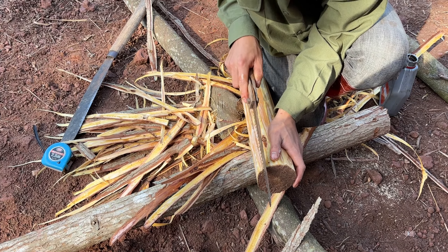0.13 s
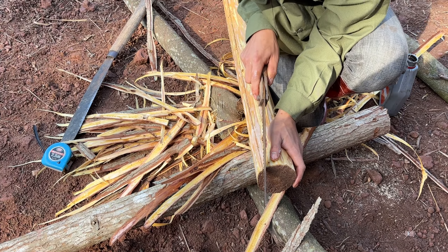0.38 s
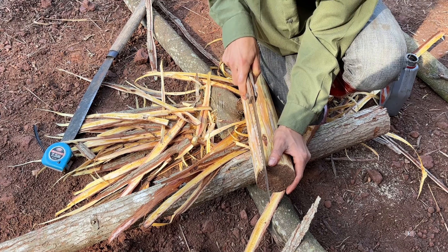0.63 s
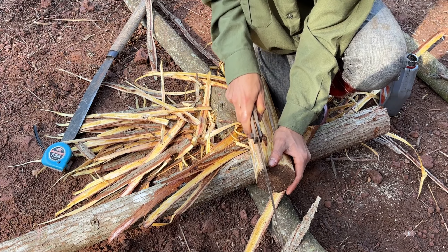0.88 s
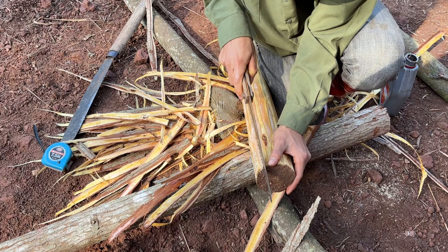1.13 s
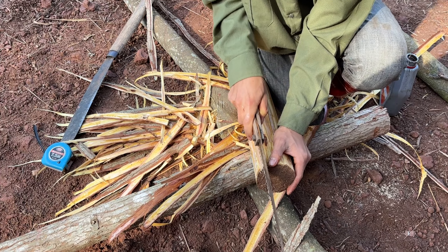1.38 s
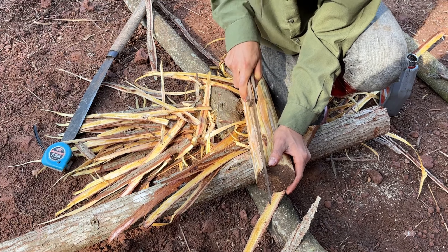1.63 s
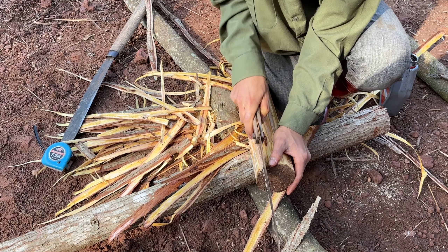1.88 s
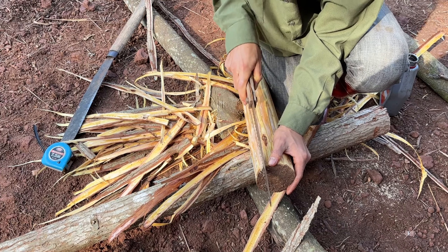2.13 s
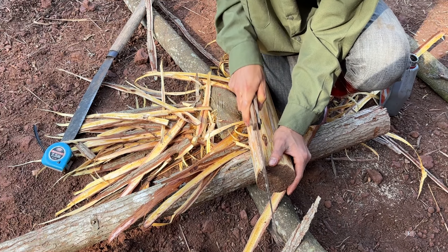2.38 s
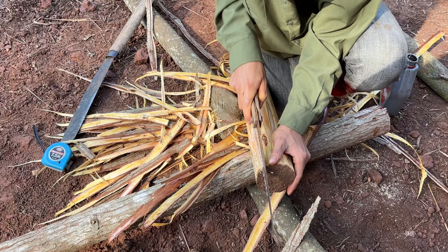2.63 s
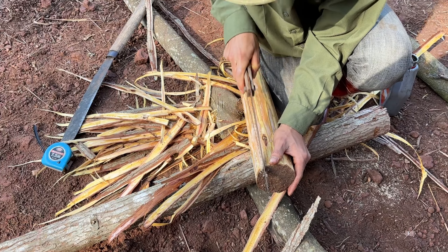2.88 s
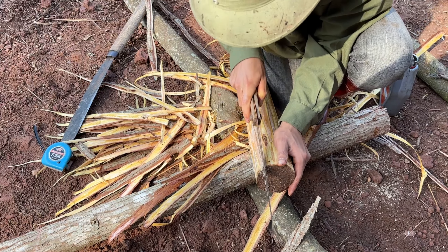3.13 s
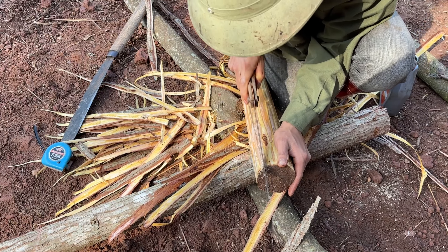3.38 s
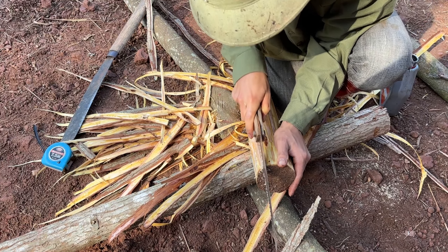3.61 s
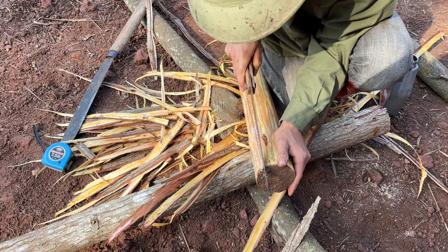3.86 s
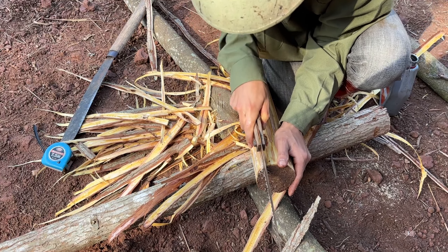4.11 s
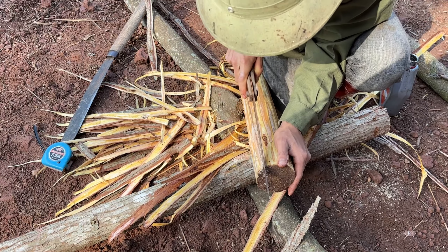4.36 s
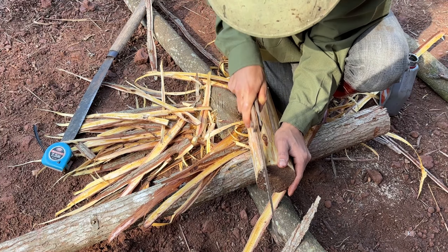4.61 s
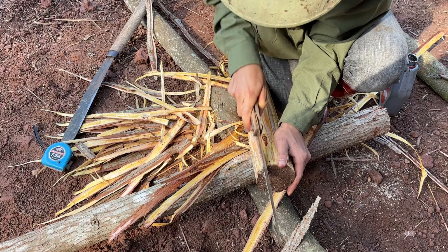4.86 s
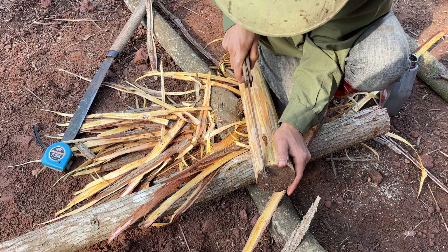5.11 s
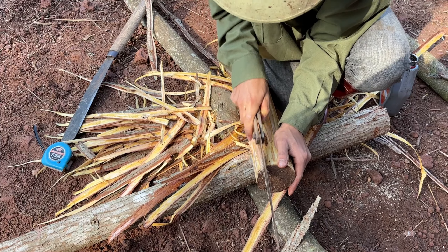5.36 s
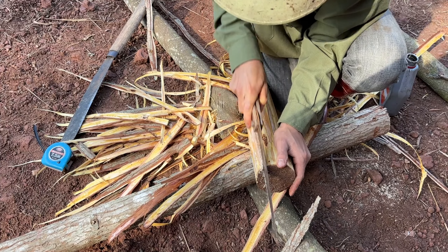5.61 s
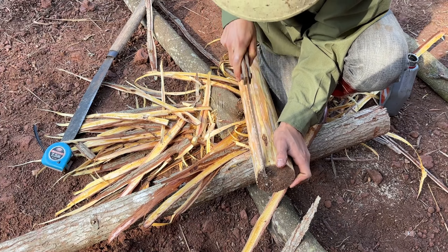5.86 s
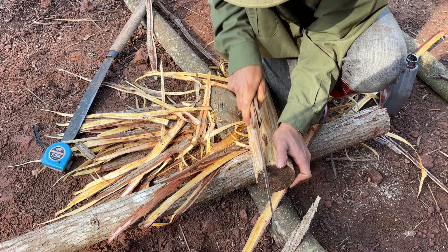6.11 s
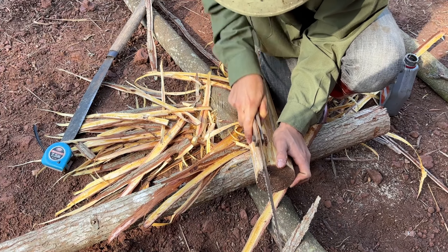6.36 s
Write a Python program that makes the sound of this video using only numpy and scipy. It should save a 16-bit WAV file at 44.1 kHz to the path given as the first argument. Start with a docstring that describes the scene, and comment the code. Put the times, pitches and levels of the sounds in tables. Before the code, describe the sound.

After faint rustling and light taps, a handsaw rasps through wood close by, woody and grainy, its strokes becoming faster, louder and harsher.

```python
"""Outdoors, a grainy noise floor with rustling cloth and leaves; over it a faint sine whistle falls in pitch.
A few ticks sound during and after the whistle: short noise bursts that excite resonances of blade and pole.
Then a coarse hand saw cuts a peeled pole near two microphone ports: tooth strikes, their rate rising and falling
with each stroke, drive the wood and its rings, while random clicks of torn fibre and grit rasp.
Later, dry snaps of fibre mark some turns of the blade, and at one turn a gliding tone squeaks."""
import sys
import numpy as np
from scipy import signal
from scipy.fft import rfft, irfft, next_fast_len
from scipy.io import wavfile
from scipy.ndimage import uniform_filter1d

SR = 44100
rng = np.random.default_rng(int(sys.argv[2]) if len(sys.argv) > 2 else 0)


def undo_db(level):
    """Turn decibels back into plain size, where 20 dB means ten times bigger."""
    steps = np.asarray(level, float) / 20
    return 10 ** steps


def unload_wav(signal):
    """Save mono or channel-first audio to the path in sys.argv[1] as 16-bit WAV at rate SR, clipped to [-1, 1]."""
    wavfile.write(
        sys.argv[1],
        SR,
        np.round(np.clip(np.atleast_2d(signal).T, -1, 1) * 32767).astype(np.int16),
    )


N = 286209

# floor before the cut, with rustles and a brief swell at a tick: (time [s], level [dB], treble level [dB])
FLOOR_COURSE = [(0.0, -71, -66), (0.034, -73, -76), (0.076, -63.5, -82), (0.086, -68, -70),
                (0.094, -68, -78), (0.274, -72.5, -82), (0.278, -73, -67), (0.368, -72, -62),
                (0.398, -70.5, -80), (0.5, -73, -78), (0.51, -55, -79), (0.522, -67, -78), (0.66, -82, -87)]
# spectrum of the open-air floor: (frequency [Hz], gain [dB])
AIR_SPECTRUM = [(30, -2), (64, 0), (234, -13), (311, -9), (734, -15), (1180, -18.5), (3460, -15.5),
                (5000, -28), (8000, -39)]
# spectrum of its leafy treble: (frequency [Hz], gain [dB])
LEAF_SPECTRUM = [(2500, -28), (4500, -14), (8000, -8), (13000, -7), (15500, -18)]
# falling whistle: (time [s], frequency [Hz], level [dB])
WHISTLE_PATH = [(0, 1850, -75), (.1, 1760, -75), (.18, 1670, -78), (.22, 1600, -88), (.25, 1570, -110)]
# light taps on the pole: (time [s], level [dB])
TICK_EVENTS = [(0.046, -57), (0.068, -56), (0.132, -59), (0.192, -50), (0.291, -50), (0.362, -32),
               (0.412, -53), (0.507, -32), (0.551, -33.5), (0.575, -50)]
# resonances of blade and pole: (frequency [Hz], width under the saw [Hz], level [dB])
RING_MODES = [(1518.4, 26, -8), (1773, 19, -16), (2634, 17, -22.5), (3099, 238, -14.5), (3278, 236, -14),
              (3484, 210, -21.5)]
# the three resonances that sing out: (frequency [Hz], width under the saw [Hz])
CLEAR_MODES = [(360, 23), (634, 8.9), (925, 8.3)]
# strokes, push and pull in turn: (start time [s], time of greatest speed [s], top rate of tooth pairs [Hz],
# bite level [dB], rasp level [dB], tooth knock level [dB], lean [exponent: under 1 late, over 1 early])
STROKE_TABLE = [(0.62, 0.792, 100.8, -32.5, -46.5, -4.5, 1.02),
                (0.849, 1.035, 96.46, -32.5, -42.5, -5, 0.99), (1.099, 1.282, 111.2, -30.5, -44, -8, 0.87),
                (1.342, 1.432, 109.2, -31.5, -41, -4, 0.91), (1.588, 1.785, 103.9, -45.5, -51, -3, 1.2),
                (1.851, 1.971, 106.2, -29, -42.5, 0.5, 1), (2.069, 2.225, 115.5, -30, -45.5, -7, 0.89),
                (2.312, 2.432, 109.3, -34.5, -43, -4.5, 1.04),
                (2.529, 2.662, 117.4, -31.5, -44.0, -6.5, 0.99),
                (2.73, 2.849, 122.7, -36.5, -41.5, -1.5, 1.105),
                (2.96, 3.165, 82.5, -35, -48.5, -2.5, 0.85), (3.248, 3.318, 105.1, -37, -43.5, -6.5, 1.09),
                (3.468, 3.6, 110.1, -30, -44.5, -6.5, 1.175), (3.679, 3.836, 130.5, -31, -40.5, -17, 1.04),
                (3.891, 4.049, 124.5, -29, -42.0, -7.5, 0.96),
                (4.117, 4.248, 113.9, -32.5, -39.5, -1.5, 1.03), (4.34, 4.502, 126.4, -28, -41, -3.5, 1.07),
                (4.561, 4.686, 151.6, -34.0, -35.5, 0.5, 0.98), (4.751, 4.896, 147.8, -30, -38.0, -3, 0.97),
                (4.953, 5.046, 119.9, -42.5, -35, -5, 0.9), (5.142, 5.266, 180.9, -27.5, -36.5, -4.5, 0.99),
                (5.34, 5.454, 164.3, -28.5, -34, -8, 1.02), (5.517, 5.657, 178.6, -25, -37.5, -8.5, 1.04),
                (5.71, 5.762, 141.6, -40, -34.5, -9, 1.01), (5.89, 5.993, 189.5, -26.0, -37.0, -6.5, 1.09),
                (6.071, 6.182, 209.2, -30, -32.5, -13, 0.85), (6.238, 6.368, 179.8, -23.5, -36, -2.5, 0.98),
                (6.421, 6.473, 141.7, -27.5, -36.5, -5.5, 1.15)]
# course of a push stroke: (share of the stroke [0 to 1], bite [dB], rasp [dB], low shake [dB], clear rings [dB])
PUSH_COURSE = [(0, -13, -41, 2, -15), (.1, -17.5, -11.5, -7, -20), (.25, -3.5, -6.5, -14.5, -3),
               (.45, -1.5, -2, -14.5, 3.5), (.63, -4, 2, -11, -0.5), (.8, -5, -3.5, -13, 2.5),
               (.9, -12, -12.5, 4, -8.5), (.999, -16, -75, -2, -6)]
# course of a pull stroke: (share of the stroke [0 to 1], bite [dB], rasp [dB], low shake [dB], clear rings [dB])
PULL_COURSE = [(0, -25, -32.5, -2, -26), (.1, -19.5, -16.5, -1, -26), (.25, -7.5, -4.5, -10.5, 0),
               (.45, -4, 0.5, 1.5, -1), (.63, -7, -1.5, -9.5, 4.5), (.8, -7.5, -7, -2, 0),
               (0.899, -22, -17.5, -7, -3), (.999, -22, -47, 3, -18)]
# the teeth catch and bite deeper: (time [s], level [dB])
CATCH_EVENTS = [(0.77, -27), (0.988, -27.5), (1.229, -23), (1.511, -32), (1.749, -22.5), (1.976, -26),
                (2.213, -25.5), (2.398, -21), (2.636, -29.5), (2.846, -38), (3.802, -39), (4.01, -13),
                (4.068, -28), (4.214, -26.5), (4.405, -34), (4.446, -18.5), (4.84, -27), (5.024, -27.5),
                (5.225, -31), (5.272, -27), (5.46, -18), (5.614, -29.0), (5.764, -26.5), (5.951, -24),
                (5.986, -27), (6.163, -38), (6.205, -32), (6.336, -18.5), (6.375, -21), (6.473, -32)]
# the pole thumps on its support: (time [s], level [dB])
THUMP_EVENTS = [(0.795, -29.5), (0.944, -34), (1.295, -38), (1.505, -33.0), (1.807, -29), (1.935, -32),
                (2.274, -37), (2.421, -39), (2.472, -33), (2.7, -37.0), (3.641, -33), (3.759, -50),
                (4.015, -48), (4.093, -28.5), (4.253, -29), (4.536, -43), (4.94, -29.5), (5.045, -36),
                (5.337, -33), (5.516, -38.0), (5.701, -44), (5.79, -41), (6.064, -37.0), (6.419, -34)]
# a clear ring sings out: (time [s], ring frequency [Hz], level [dB])
SING_EVENTS = [(0.772, 634, -44), (0.783, 360, -43), (0.985, 360, -39), (0.996, 925, -36.5),
               (1.025, 634, -37), (1.233, 634, -34), (1.242, 925, -40), (1.305, 925, -42.0),
               (1.451, 925, -38.0), (1.474, 634, -40), (1.739, 360, -35.0), (1.749, 634, -32.5),
               (1.773, 925, -32.5), (1.974, 360, -47), (1.983, 634, -32), (1.995, 925, -44),
               (2.244, 360, -41), (2.245, 925, -40), (2.39, 360, -38.5), (2.408, 634, -29.0),
               (2.442, 360, -32.5), (2.466, 925, -44), (2.63, 925, -40.5), (2.662, 360, -31),
               (2.688, 925, -43), (2.837, 634, -29.5), (2.848, 360, -35.5), (2.852, 925, -43.5),
               (3.111, 634, -36), (3.357, 634, -41), (3.421, 634, -35.5), (3.569, 634, -33),
               (3.586, 360, -34), (3.619, 634, -42), (3.852, 634, -32.5), (4.013, 634, -22.5),
               (4.014, 360, -28.5), (4.015, 925, -36.0), (4.056, 925, -42), (4.07, 360, -30.5),
               (4.221, 634, -34), (4.239, 360, -40), (4.408, 360, -46), (4.424, 634, -40),
               (4.448, 925, -31.5), (4.471, 634, -33), (4.516, 360, -39.5), (4.673, 634, -33),
               (4.679, 925, -39), (4.802, 360, -36), (4.818, 925, -42), (4.822, 634, -36),
               (4.863, 634, -27.5), (4.896, 925, -33), (5.029, 925, -31.5), (5.054, 634, -39),
               (5.109, 634, -34), (5.22, 360, -37), (5.273, 925, -31), (5.275, 360, -44), (5.299, 634, -45),
               (5.392, 925, -43.5), (5.45, 925, -36), (5.474, 634, -28.5), (5.489, 360, -40),
               (5.608, 634, -28.0), (5.618, 360, -40), (5.652, 925, -26), (5.672, 634, -42),
               (5.76, 925, -36.5), (5.762, 360, -33), (5.805, 634, -24.5), (5.807, 360, -36),
               (5.809, 925, -35), (5.866, 925, -41.0), (5.988, 360, -36), (5.99, 634, -46),
               (5.989, 925, -28), (6.158, 925, -42), (6.16, 634, -34.5), (6.218, 634, -30),
               (6.314, 925, -27.5), (6.318, 634, -25.5), (6.337, 360, -29.5)]
# the blade rasps harder for a moment, or rubs on through a turn: (time [s], level [dB])
RUB_EVENTS = [(0.695, -53), (1.16, -58), (1.26, -48), (1.759, -42), (1.967, -41.0), (2.234, -62),
              (2.406, -37), (3.009, -48.0), (3.251, -49), (3.339, -53), (3.753, -60), (3.938, -53.5),
              (4.055, -46.5), (4.221, -38), (4.34, -48), (5.041, -52), (5.781, -39), (6.353, -44)]
# levels over the rasp: (time [s], scrape level [dB], high ring level [dB])
SCRAPE_COURSE = [(.6, -1, 1.5), (1.4, 4, 1.5), (1.8, 3.5, 1.5), (2.8, 3, 2.5), (4.0, -0.5, 0.5),
                 (4.6, 2, 2), (5.2, 2.5, 2), (6.0, 5, 6), (6.5, 1.5, 2)]
# spectrum of the struck wood: (frequency [Hz], gain [dB])
WOOD_SPECTRUM = [(60, -43.5), (100, -9.5), (200, -2), (300, -2), (420, -5), (560, -3.5), (780, -10.5),
                 (1100, -32.5), (1500, -48), (2500, -71.5)]
# spectrum of the rasping grit: (frequency [Hz], gain [dB])
RASP_SPECTRUM = [(700, 5.5), (1300, 7.5), (2200, -18), (4000, -2.5), (5500, -7.5), (8000, -2), (10000, -1),
                 (13000, -10), (14600, -9.5), (15700, -24)]
# spectrum of the scrape: (frequency [Hz], gain [dB])
SCRAPE_SPECTRUM = [(600, -40), (1000, -34), (1500, 7.5), (2200, -3.5), (3000, -11.5), (4500, -7.5)]
# spectrum of the shaken pole: (frequency [Hz], gain [dB])
SHAKE_SPECTRUM = [(25, -45), (45, -38.5), (60, 17.5), (80, -11), (108, 9), (135, 5), (200, -49.5)]
# fibre snaps at the turns of the blade: (time [s], level [dB])
SNAP_EVENTS = [(1.3858, -58), (2.359, -23), (2.4937, -44), (2.518, -33), (2.5431, -32), (3.003, -30),
               (4.0794, -28), (4.1595, -34), (4.591, -41), (4.9843, -29), (5.899, -26)]
# squeak of the blade at one turn: (time [s], frequency [Hz], level [dB])
SQUEAK_PATH = [(2.488, 3440, -75), (2.494, 3650, -47), (2.499, 4050, -55), (2.504, 4580, -80)]
# phase between left and right, with fixed steps in the treble: (frequency [Hz], phase [turns])
LEFT_RIGHT_PHASE = [(0, 0), (2200, 0), (3000, .06), (3800, 0), (4900, 0), (5600, -.15), (6400, 0),
                    (7400, 0), (9500, -.485), (10500, -.515), (12200, -1), (13200, -1), (14800, -1.46),
                    (15300, -1.49), (22050, -1.49)]
# gain on the left, its inverse on the right: (frequency [Hz], gain [dB])
LEFT_GAIN = [(60, -0.5), (1200, -0.8), (2500, -0.5), (3000, 0)]
# spectrum of a diffuse part added with opposite sign left and right: (frequency [Hz], gain [dB])
DIFFUSE_SPECTRUM = [(60, -10), (300, -14), (1200, -7.5), (2500, -5), (3400, -8), (4500, -36), (5600, 0.5),
                    (7000, -17), (8500, -59), (11500, -86), (12800, -36), (14200, -36)]

LAST_TURN_S = 6.6   # end of the last stroke, beyond the end of the sound
TOUCH_S = .664      # the moving blade meets the wood
SHAKE_DB = -43
CLEAR_UNDER_BITE_DB = (15, 14.5, 19)
# slopes of the swells: (up [dB/s], down [dB/s])
CATCH_SLOPES, THUMP_SLOPES = (460, 650), (270, 410)
SING_SLOPES, RUB_SLOPES = (470, 470), (440, 330)


def rms_one(x):
    """Normalisation to unit root-mean-square amplitude."""
    return x / np.sqrt(np.mean(x ** 2) + 1e-20)


def in_time(rows):
    """Linear interpolation of a table's columns, one value a sample."""
    s, *columns = np.transpose(rows)
    return [np.interp(np.arange(N) / SR, s, column) for column in columns]


def at_hz(points, hz):
    """Interpolation of a spectrum table on a logarithmic frequency axis."""
    table_hz, db = np.transpose(points)
    return np.interp(np.log(hz), np.log(table_hz), db)


def colour(x, points):
    """Minimum-phase filtering by the folded cepstrum: the response is causal, so nothing sounds early."""
    size = 8192
    hz = np.arange(1, size // 2 + 2) * SR / size
    cepstrum = irfft(np.log(undo_db(at_hz(points, hz))))
    cepstrum[1:size // 2] *= 2
    cepstrum[size // 2 + 1:] = 0
    response = irfft(np.exp(rfft(cepstrum)))[:size // 2]
    return signal.fftconvolve(x, response)[:N]


def resonance(x, hz, width_hz):
    """A damped mode as a two-pole resonance with unit gain at its peak."""
    r = np.exp(-np.pi * width_hz / SR)
    zeros = [(1 - r * r) / 2, 0, (r * r - 1) / 2]
    poles = [1, -2 * r * np.cos(2 * np.pi * hz / SR), r * r]
    return signal.lfilter(zeros, poles, x + 1e-18)


def grains(per_s, spread_db):
    """Shot noise: random clicks of either sign, with exponentially spread levels, rms 1."""
    sizes = undo_db(spread_db * np.minimum(rng.exponential(1, N), 4)) * rng.choice([-1, 1], N)
    return rms_one(sizes * (rng.random(N) < per_s / SR))


def drift(rate_hz):
    """Slow random fluctuation: white noise through a double real pole, rms 1."""
    r = np.exp(-2 * np.pi * rate_hz / SR)
    settle = 9000
    noise = rng.standard_normal(N + settle)
    return rms_one(signal.lfilter([1], [1, -2 * r, r * r], noise)[settle:])


def bursts(events, dull_hz, rise_s, decay_s):
    """Contact noise: short band-passed puffs, a softer contact having a lower upper limit."""
    out, t = np.zeros(N), np.arange(2500) / SR
    band = signal.butter(2, [200, dull_hz], "band", fs=SR, output="sos")
    rise = (1 - np.exp(-t / rise_s)) ** 2
    shape = rise * (np.exp(-t / decay_s) + 0.013 * np.exp(-t / (5 * decay_s)))
    for s, level_db in events:
        puff = rms_one(signal.sosfilt(band, rng.standard_normal(len(t))))
        start = round(s * SR)
        out[start:start + len(t)] += undo_db(level_db - 13.5) * puff * shape
    return out


def glide(rows):
    """A sinusoid whose phase integrates a table of frequency and level, silent outside it."""
    (first_s, first_hz, _), (last_s, last_hz, _) = rows[0], rows[-1]
    hz, level_db = in_time([(first_s - .002, first_hz, -140), *rows, (last_s + .002, last_hz, -140)])
    return np.sqrt(2) * undo_db(level_db) * np.sin(2 * np.pi * np.cumsum(hz) / SR)


def air():
    """Outdoor floor as coloured shot noise, its level set by a table; its treble fluctuates independently."""
    floor_db, treble_db = in_time(FLOOR_COURSE + [(.7, -81, -73)])
    floor = rms_one(colour(grains(4000, spread_db=-3.0), AIR_SPECTRUM))
    leaves = rms_one(colour(grains(6000, spread_db=3.0), LEAF_SPECTRUM))
    return undo_db(floor_db + 2.5 + 2.0 * drift(47.0)) * floor + undo_db(treble_db + 3.1 * drift(30)) * leaves


def whistle():
    """A faint pure tone falling in frequency."""
    return glide(WHISTLE_PATH)


def ticks():
    """Impulsive excitation: light taps on the pole also stir its modes, which here are broad and die fast."""
    taps = bursts(TICK_EVENTS, dull_hz=2580, rise_s=0.0014, decay_s=0.0031)
    rung = sum(undo_db(db) * resonance(taps, hz, 5.4 * width) for hz, width, db in RING_MODES)
    rung += sum(resonance(taps, hz, 16.0 * width) for hz, width in CLEAR_MODES)
    return taps + undo_db(13.0) * rung


def per_stroke(column):
    """A stepwise control: one value held through each stroke."""
    table = np.array(STROKE_TABLE)
    now = np.searchsorted(table[:, 0], np.arange(N) / SR) - 1
    return table[np.maximum(now, 0), column]


def teeth(arch=.6):
    """Strikes follow the distance travelled: the hand speeds up and slows, and set teeth alternate in strength."""
    jitter, weak_db, uneven_db = .04, -6, 1.5   # jitter in tooth spacings
    times = np.append(np.array(STROKE_TABLE)[:, :2].ravel(), LAST_TURN_S)
    # the angle advances a quarter turn from start to fastest, and another to the next start
    quarter_turns = np.interp(np.arange(N) / SR, times, np.arange(len(times)))
    speed = np.abs(np.sin(np.pi / 2 * quarter_turns)) ** arch
    pair_rate = per_stroke(column=2)
    passed = np.cumsum(2 * pair_rate * speed) / SR   # teeth gone by
    count = np.arange(1, 2000)
    slip, size = rng.standard_normal((2, len(count)))
    strikes = np.zeros(N + 1)   # the spare sample takes the teeth beyond the end
    strikes[np.searchsorted(passed, count + jitter * slip)] = undo_db(weak_db * (count % 2) + uneven_db * size)
    # a faster stroke bites less deeply with each tooth
    return rms_one(strikes[:N] / np.sqrt(pair_rate)), passed


def course():
    """Periodic modulation: each stroke runs through the course of a push or a pull, leaning early or late."""
    starts = np.append(np.array(STROKE_TABLE)[:, 0], LAST_TURN_S)
    rows = []
    for k, stroke in enumerate(STROKE_TABLE):
        start, end, lean = starts[k], starts[k + 1], stroke[-1]
        for share, *db in (PUSH_COURSE, PULL_COURSE)[k % 2]:
            rows.append((start + share ** lean * (end - start), *db))
    return in_time(rows)


def swollen(base_db, events, slopes):
    """Powers add: swells, rising and falling at steady slopes in dB, join a base level."""
    t = np.arange(0, N, 32) / SR
    s, peak_db = np.array(events)[:, [0]], np.array(events)[:, [-1]]
    fall_db = np.maximum(slopes[0] * (s - t), slopes[1] * (t - s))
    power = np.sum(undo_db(2 * (peak_db - fall_db)), axis=0)
    return 10 * np.log10(undo_db(2 * base_db) + np.interp(np.arange(N) / SR, t, power))


def levels():
    """Levels in dB of bite, rasp, shake and clear rings: stroke strength, course and swells, 60 dB down before touch."""
    bite, rasp, shake, clear = course()
    bite_strength, rasp_strength = [uniform_filter1d(per_stroke(column=k), size=600) for k in (3, 4)]
    sung = []
    for under_db, (hz, _) in zip(CLEAR_UNDER_BITE_DB, CLEAR_MODES):
        own = [row for row in SING_EVENTS if abs(row[1] / hz - 1) < .15]
        sung.append(swollen(bite_strength + clear - under_db, own, SING_SLOPES))
    lifted_db = np.interp(np.arange(N) / SR, [TOUCH_S - .004, TOUCH_S + .004], [-60, 0])
    return lifted_db + np.array([swollen(bite_strength + bite, CATCH_EVENTS, CATCH_SLOPES),
                                 swollen(rasp_strength + rasp, RUB_EVENTS, RUB_SLOPES),
                                 swollen(SHAKE_DB + shake, THUMP_EVENTS, THUMP_SLOPES), *sung])


def evened(x, share=0.1):
    """Partial levelling: a narrow noise-driven resonance flutters, and some of that is evened out."""
    level = np.sqrt(uniform_filter1d(x ** 2, size=900) + 1e-12)
    return rms_one(x / level ** share)


def patchy(x, patchy_db, rate_hz):
    """Independent modulation of octave bands, so that the colour keeps changing."""
    edges = 700 * 2. ** np.arange(5)
    lows = [signal.sosfiltfilt(signal.butter(2, hz, fs=SR, output="sos"), x) for hz in edges] + [x]
    bands = [high - low for low, high in zip([0] + lows, lows)]
    return rms_one(sum(band * undo_db(patchy_db * drift(rate_hz)) for band in bands))


def saw():
    """Forced vibration: tooth strikes and tearing fibres drive wood and rings; fine grit rasps with the teeth."""
    bite_db, rasp_db, shake_db, *clear_db = levels()
    scrape_db, ring_db = in_time(SCRAPE_COURSE)
    strikes, passed = teeth()
    knocks = undo_db(per_stroke(column=5)) * strikes
    fibres = grains(2500, spread_db=3.0)
    wood = colour(undo_db(bite_db) * (knocks + undo_db(-7) * fibres), WOOD_SPECTRUM)

    # the blade's high rings follow the grit
    high = undo_db(ring_db + rasp_db + 12.5) * (undo_db(-11.5) * knocks + fibres)
    rings = np.zeros(N)
    for k, (hz, width, db) in enumerate(RING_MODES):
        # as the contact slides along the blade each ring is driven more or less
        driven = undo_db(2.24 * drift(16.0)) * high
        rings += undo_db(db) * (-1) ** k * resonance(driven, hz, width)
    clear = sum(undo_db(db) * evened(resonance(knocks + fibres, hz, width))
                for db, (hz, width) in zip(clear_db, CLEAR_MODES))

    # the grain of the wood catches unevenly
    pulse = (1 + 0.069 * np.cos(2 * np.pi * passed)) * undo_db(2.0 * drift(110))
    grit = colour(grains(7000, spread_db=2.5), RASP_SPECTRUM)
    rasp = undo_db(rasp_db) * pulse * patchy(grit, patchy_db=-0.5, rate_hz=8.7)
    scraped = rms_one(colour(grains(2700, spread_db=0.0), SCRAPE_SPECTRUM))
    scrape = undo_db(rasp_db + scrape_db - 7.0 + 2.0 * drift(19.76)) * scraped

    # the pole rocks on its support once for each pair of teeth
    shaking = rms_one(colour(rng.standard_normal(N), SHAKE_SPECTRUM))
    rocking = undo_db(5.0) * np.sin(np.pi * passed + .5 * drift(7.7)) + shaking
    # a deep bite also sounds the bare rate of the tooth pairs
    throb = undo_db(bite_db - 15.0) * np.sin(np.pi * passed)
    return undo_db(14.0) * wood + clear + undo_db(11.5) * rings + rasp + scrape + undo_db(shake_db - 6.0) * rocking + throb


def snaps():
    """Sudden fracture: fibres snap drily at turns of the blade, as fast-rising noise bursts."""
    return bursts(SNAP_EVENTS, dull_hz=9000, rise_s=0.00052, decay_s=0.0043)


def squeak():
    """A brief tone of the blade, its frequency gliding upwards at one turn."""
    return glide(SQUEAK_PATH)


def surroundings(x, t60_s=0.071, level_db=-8.5):
    """Diffuse reflection: trees and ground return a faint, exponentially decaying tail."""
    t = np.arange(12000) / SR
    tail = rms_one(rng.standard_normal(len(t)) * undo_db(-60 * t / t60_s)) / np.sqrt(len(t))
    return undo_db(level_db) * signal.fftconvolve(x, tail)[:N]


def ports(x):
    """Stereo difference: tables set level and phase between left and right; a diffuse part has opposite signs."""
    size = next_fast_len(N + 4096)
    hz = np.arange(size // 2 + 1) * SR / size
    phase = 2 * np.pi * np.interp(hz, *np.transpose(LEFT_RIGHT_PHASE))
    # half the phase goes to the left, its inverse to the right
    left = undo_db(at_hz(LEFT_GAIN, hz + 1)) * np.exp(.5j * phase)
    direct = irfft(rfft(x, size) * left ** np.array([[1], [-1]]), size)[:, :N]
    t = np.arange(1500) / SR
    tail = rng.standard_normal(len(t)) * np.exp(-t / 0.01)
    tail /= np.linalg.norm(tail)
    diffuse = colour(signal.fftconvolve(x, tail)[:N], DIFFUSE_SPECTRUM)
    # a random drift keeps the diffuse part changing
    return direct + diffuse * np.tanh(2 * drift(8.1)) * [[1], [-1]]


def scene():
    """Superposition: the near sources, their reflections, the whistle and the air reach both ports."""
    near = ticks() + saw() + snaps() + squeak()
    return ports(air() + whistle() + near + surroundings(near))


def top_cut(x):
    """Nothing passes above the cut-off."""
    return signal.sosfilt(signal.butter(12, 15720, fs=SR, output="sos"), x)


def record(dry):
    """High-pass response: the microphones drop the deepest bass, below 63 Hz."""
    low_cut = signal.butter(4, 63, "high", fs=SR, output="sos")
    mix = signal.sosfilt(low_cut, dry)
    return top_cut(mix)


dry = scene()
out = record(dry)
unload_wav(out)
```